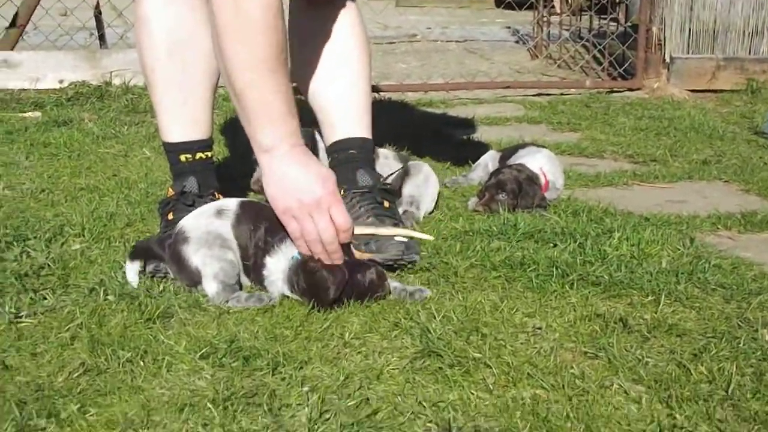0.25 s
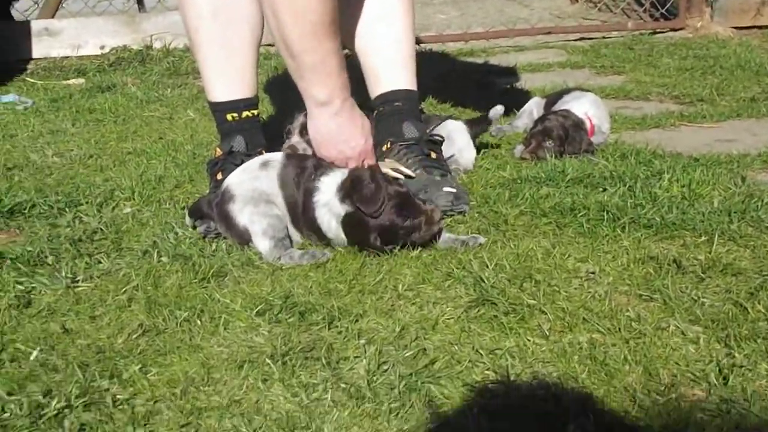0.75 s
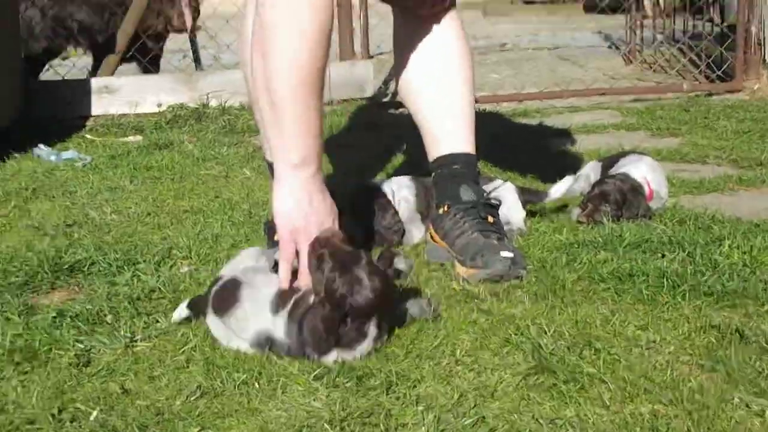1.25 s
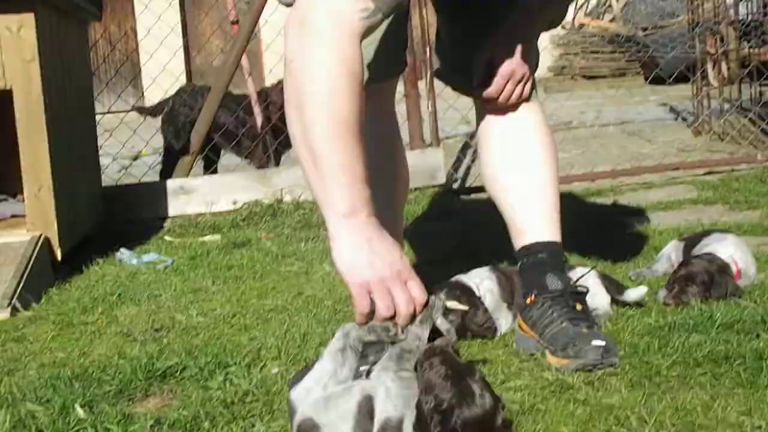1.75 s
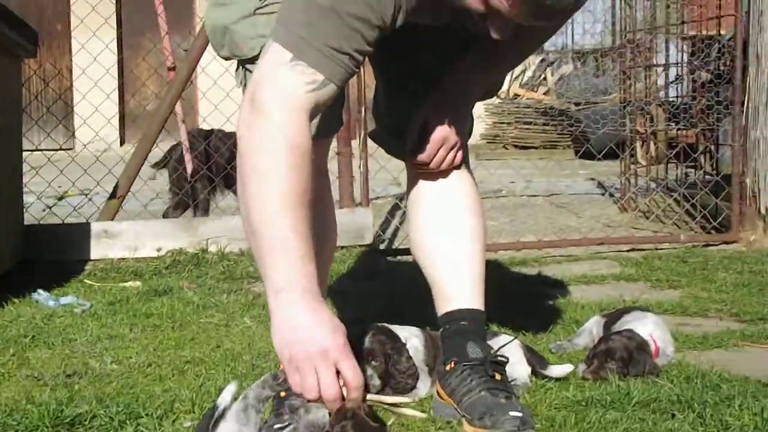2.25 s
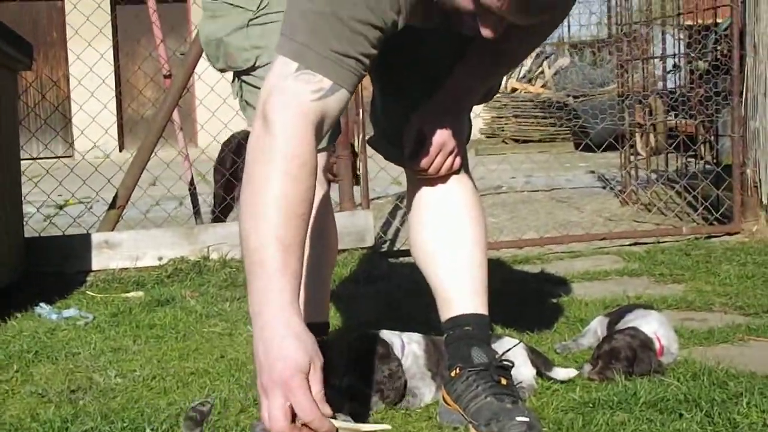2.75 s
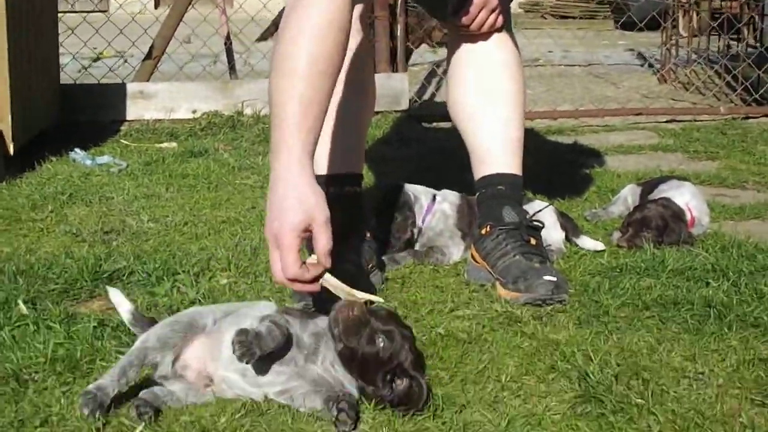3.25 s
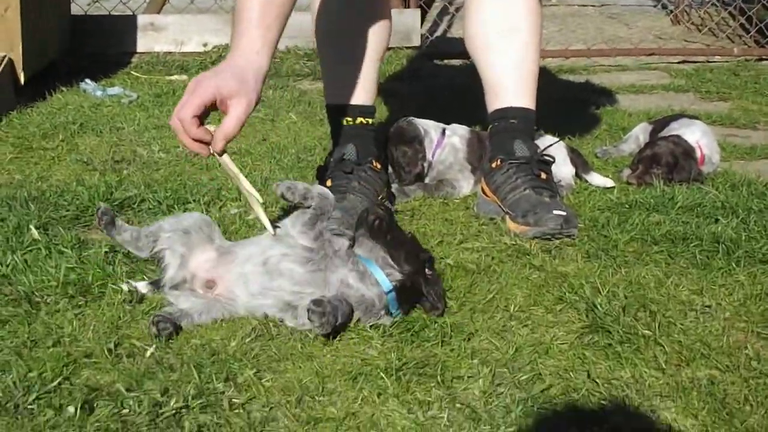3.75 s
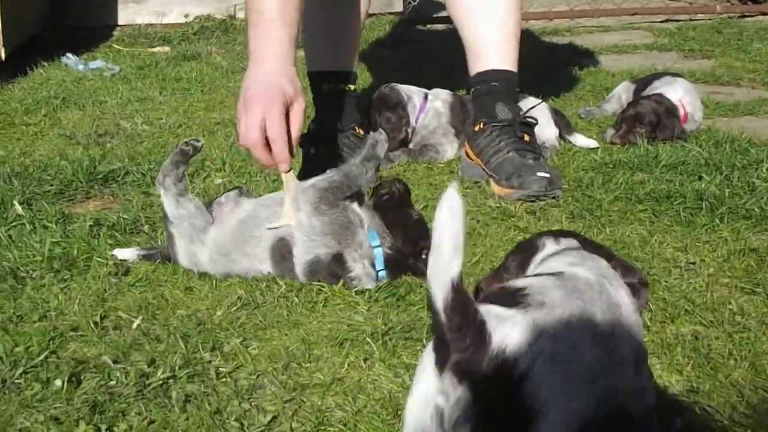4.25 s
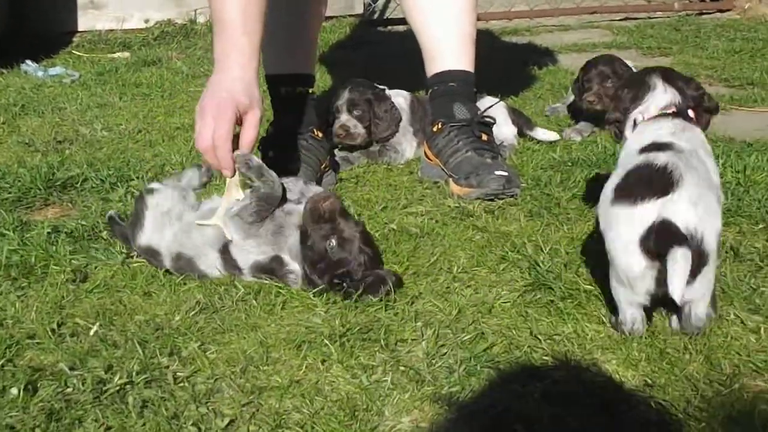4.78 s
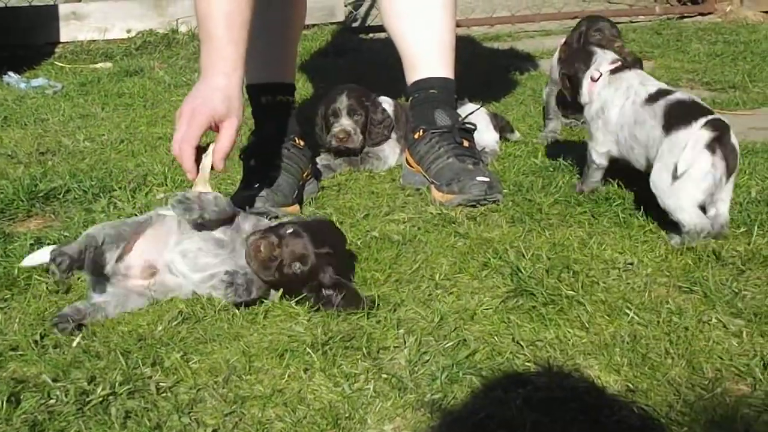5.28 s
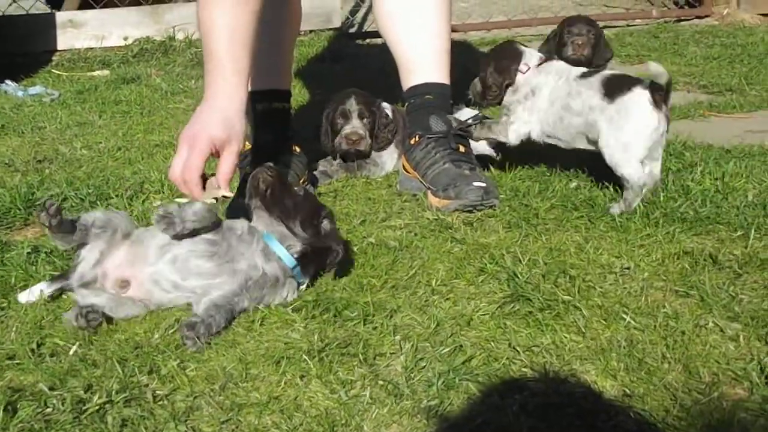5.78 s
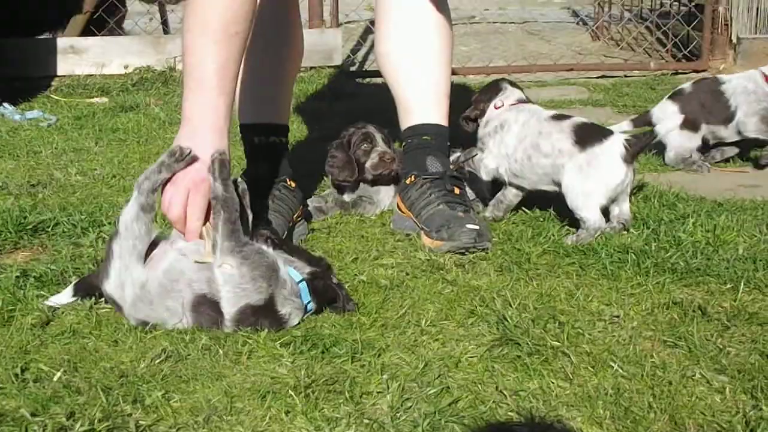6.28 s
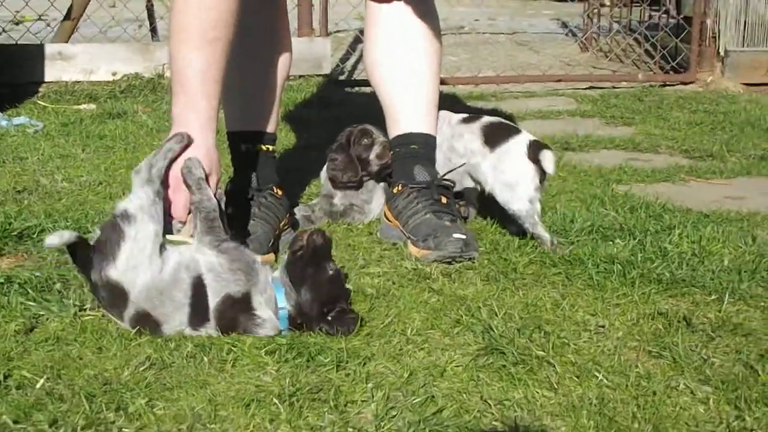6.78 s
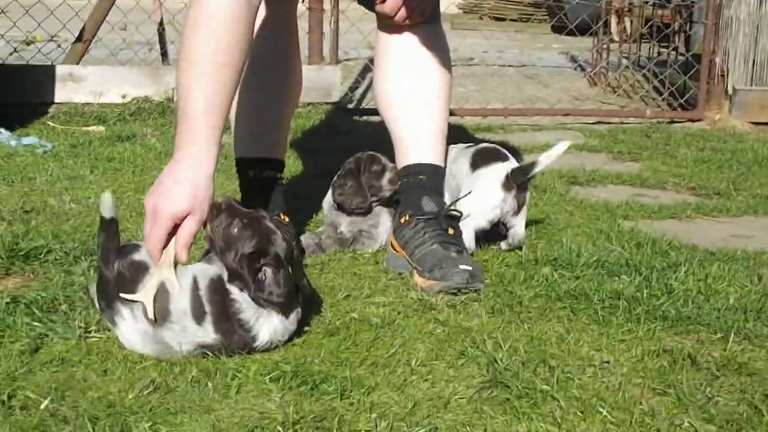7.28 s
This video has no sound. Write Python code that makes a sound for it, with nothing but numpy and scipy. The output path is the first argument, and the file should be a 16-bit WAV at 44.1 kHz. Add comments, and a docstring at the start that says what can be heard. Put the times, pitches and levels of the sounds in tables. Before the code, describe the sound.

Close dry grass rustling, paw scuffs and sudden hard knocks of teeth on a chew, over constant hiss and brief low gusts of wind.

```python
"""Puppy on the lawn

A puppy rolls on a lawn and grabs at a hard forked chew held in a hand, while its litter mates potter about.
Grass crackles as showers of random snaps; paws scuff in short dense showers; bites on the chew are damped
modes with bursts of noise. Gusts are low noise rumbling on the microphone, over a steady hiss and a faint whine.
The hollow resonances of the microphone housing colour the hiss and the rustle."""
import sys
import numpy as np
from scipy import signal
from scipy.fft import rfft, irfft, next_fast_len
from scipy.io import wavfile
from scipy.ndimage import uniform_filter1d

SR = 44100
rng = np.random.default_rng(int(sys.argv[2]) if len(sys.argv) > 2 else 0)


def dump_mix(stems):
    """Bounce the given channels to the path in sys.argv[1] as a 16-bit WAV at rate SR."""
    frames = np.atleast_2d(stems).T  # one column per channel
    limited = np.clip(frames, -1, 1)  # hard clip at full scale
    pcm = np.round(limited * 32767).astype(np.int16)
    wavfile.write(sys.argv[1], SR, pcm)


N = 332073
TIME = np.arange(N) / SR  # seconds
FFT_SIZE = next_fast_len(N)
BINS = np.maximum(np.fft.rfftfreq(FFT_SIZE, 1 / SR), 1)  # Hz, kept above 0 for the logarithm


def from_db(db):
    """Decibels to gain."""
    return 10 ** (np.asarray(db) / 20)


def rms_one(x):
    """Scale to unit power."""
    return x / np.sqrt(np.mean(x ** 2) + 1e-20)


def at_bins(points):
    """Read a table of (Hz, value) at every bin, straight lines over log frequency."""
    hz, value = np.transpose(points)
    return np.interp(np.log(BINS), np.log(hz), value)


def band(x, low_hz, high_hz, order=2):
    """Causal band-pass."""
    edges = [low_hz, min(high_hz, .45 * SR)]
    return signal.sosfilt(signal.butter(order, edges, "band", fs=SR, output="sos"), x)


def add(track, s, sound):
    """Mix a sound into a track from time s on."""
    start = round(s * SR)
    low, high = max(start, 0), min(start + sound.shape[-1], N)
    track[..., low:high] += sound[..., low - start:high - start]


def flutter(per_s):
    """A random wavering with unit rms, given its turning points per second."""
    knots = rng.standard_normal(4000)
    return rms_one(np.interp(TIME * per_s, np.arange(len(knots)), knots))


def swell(half_s):
    """Time axis around a brief event and its bell-shaped envelope."""
    reach = int(3 * half_s * SR)
    t = np.arange(-reach, reach) / SR
    return t, np.exp(-.5 * (t / half_s) ** 2)


def surge(s, rise_s, fall_s, shape=1.72):
    """A rounded build-up to 1 at time s and a die-away."""
    distance = np.abs((TIME - s) / np.where(TIME < s, rise_s, fall_s))
    return np.exp(-.5 * np.minimum(distance ** shape, 100))


def grains(count, per_s, spread_db):
    """Two streams of tiny random snaps: many weak, a few strong."""
    born = rng.random((2, count)) < per_s / SR
    sizes = from_db(spread_db * np.minimum(rng.exponential(1, (2, count)), 4))
    return born * sizes * rng.choice([-1, 1], (2, count))


def ring(t, hz, t60, rise_s=0.00042):
    """A damped mode, set going by a contact of finite length."""
    return from_db(-60 * t / t60) * np.sin(2 * np.pi * hz * t) * (1 - np.exp(-t / rise_s))


def housing():
    """Peaks and notches of the cavities in front of the microphone, in dB."""
    # Cavity colours. Each row: centre in Hz, full width at half height in Hz, peak or notch in dB.
    cavities = [(854, 120, 2.5), (1250, 228, 10.5), (1810, 190, 4.5), (2130, 140, -4), (2351, 244, 10),
                (2640, 88, -2.5), (2990, 270, 5), (3000, 75, -2), (3275, 193, 11), (3552, 200, 7.5),
                (3890, 144, -9), (4700, 230, 4), (5110, 160, -6), (5675, 395, -9.5)]
    return sum(db * np.exp(-np.log(2) * (2 * (BINS - hz) / width) ** 2) for hz, width, db in cavities)


def in_housing(x, share):
    """A brief sound rings on in the housing: the same peaks and notches, with causal phase."""
    cepstrum = irfft(np.log(from_db(share * housing())), FFT_SIZE)[:FFT_SIZE // 2]
    response = np.exp(2 * rfft(cepstrum, FFT_SIZE))
    return irfft(rfft(x, FFT_SIZE) * response, FFT_SIZE)[..., :N]


def in_stereo(pair, colour_db):
    """Colour two unrelated signals and mix them into left and right, identical in the bass; rms 1."""
    # Stereo width. Each row: frequency in Hz, left-right correlation.
    likeness = [(300, 1), (2000, .997), (4500, .96), (9000, .87), (14000, .85)]
    mid, side = rfft(pair, FFT_SIZE) * from_db(colour_db)
    alike = np.clip(at_bins(likeness), -1, 1)
    left_right = np.sqrt(1 + alike) * mid + np.sqrt(1 - alike) * side * [[1], [-1]]
    return rms_one(irfft(left_right, FFT_SIZE)[:, :N])


def whine():
    """Faint steady sine tones, the whine of electronics."""
    # Electronic tones. Each row: pitch in Hz, rms level in dB.
    tones = [(2801, -61.5), (7220, -69), (8021, -80)]
    return sum(from_db(db) * np.sqrt(2) * np.sin(2 * np.pi * hz * TIME) for hz, db in tones)


def hiss(level_db=-41):
    """Even background hiss: noise coloured by the housing."""
    # Hiss spectrum ahead of the housing. Each row: frequency in Hz, density in dB per Hz.
    hiss_spectrum = [(30, -2.5), (130, 0), (300, -1), (450, -5.5), (700, -5.5), (1000, -5.5), (1550, -7),
                     (2500, 1.5), (4200, -1.5), (7300, -2.5), (8300, -14), (9700, -22), (13500, -24),
                     (15800, -27)]
    return from_db(level_db) * in_stereo(rng.standard_normal((2, N)), at_bins(hiss_spectrum) + housing())


def wind(calm_db=-52.5, fine_eddies_db=-22):
    """Eddies rumble alike on left and right; each sudden buffet reaches up to its own edge frequency."""
    # Gusts on the microphone. Each row: height in seconds, rumble in dB, build-up in s, die-away in s.
    gusts = [(.05, -24.5, 0.24, .33), (.6, -29.5, 0.08, 0.088), (1.22, -42, 0.099, 0.14),
             (1.49, -33, 0.046, 0.052), (1.72, -40.5, 0.035, 0.16), (3.06, -37.5, .12, 0.052),
             (3.28, -38, 0.062, 0.088), (6.58, -45, 0.023, 0.14), (7.09, -35.5, .07, 0.11),
             (7.44, -30, 0.059, 0.041)]
    # Sudden buffets of air. Each row: centre in seconds, rms at the height in dB, half length in s,
    # upper edge in Hz.
    buffets = [(0.013, -16, 0.01, 307), (0.1, -24, 0.011, 285), (0.145, -19.5, 0.014, 71),
               (0.186, -34, 0.023, 210), (0.341, -29.5, 0.027, 152), (0.583, -32, 0.014, 220),
               (0.614, -25.5, .018, 100), (3.054, -32.5, 0.021, 61.6), (6.589, -41, 0.0117, 200),
               (6.652, -38.5, 0.027, 213), (7.195, -36, .022, 214), (7.442, -31.5, 0.014, 82)]
    # Rumble spectrum. Each row: frequency in Hz, density in dB per Hz.
    rumble_spectrum = [(15, 2), (30, 3), (60, -2), (100, -9.5), (200, -23), (400, -51), (800, -64)]

    power = from_db(calm_db) ** 2  # the breeze between gusts
    for s, db, rise_s, fall_s in gusts:
        power = power + (from_db(db) * surge(s, rise_s, fall_s)) ** 2
    eddies = in_stereo(rng.standard_normal((2, N)), at_bins(rumble_spectrum))
    # even out the slow swings, so that the gusts alone set the level
    eddies = eddies / np.sqrt(uniform_filter1d(eddies[0] ** 2, SR // 8))
    out = np.sqrt(power) * eddies

    for s, db, half_s, hz in buffets:
        t, envelope = swell(half_s)
        air = rng.standard_normal(SR // 2)
        # a weak band of finer eddies lies above the edge
        puff = band(air, hz / 4, hz, order=3) + from_db(fine_eddies_db) * band(air, hz, 3 * hz)
        puff = puff[-len(t):] * envelope  # the settled end of the filtered noise
        add(out, s + t[0], from_db(db) * rms_one(puff) * np.sqrt(np.mean(envelope ** 2)))
    return out


def squeaks(roughness=0.38):
    """Brief thin tones whose pitch jitters at random from sample to sample."""
    # Faint short squeaks. Each row: centre in seconds, rms at the height in dB, half length in s, pitch in Hz.
    squeak_table = [(2.215, -46, .016, 1040), (2.697, -45, 0.011, 1055), (7.254, -32.5, 0.0074, 1622)]
    out = np.zeros(N)
    for s, db, half_s, hz in squeak_table:
        t, envelope = swell(half_s)
        unsteady_hz = hz * (1 + roughness * rng.standard_normal(len(t)))
        phase = 2 * np.pi * np.cumsum(unsteady_hz) / SR
        add(out, s + t[0], from_db(db) * np.sqrt(2) * envelope * np.sin(phase))
    return out


def bumps(t60=0.035, low_hz=110, high_hz=800):
    """Soft soil answers a body or paw with a dull short thud of decaying noise."""
    # Bumps on the soil. Each row: start in seconds, peak level in dB.
    bump_table = [(0.976, -31), (1.465, -38), (1.511, -25), (1.523, -28.5), (1.737, -36), (1.978, -36),
                  (5.45, -31.5), (6.178, -27.5), (6.561, -31)]
    out, t = np.zeros(N), np.arange(SR // 10) / SR
    for s, db in bump_table:
        thud = band(rng.standard_normal(len(t)) * from_db(-60 * t / t60), low_hz, high_hz, order=1)
        add(out, s, from_db(db) * thud / np.abs(thud).max())
    return out


def tussle(rest_rustle_db=-56, rest_swish_db=-66, swish_power=1.9):
    """Levels in dB of the bending of blades and of the sliding over them; overlapping rolls add in power."""
    # The puppy rolls or wriggles. Each row: height in seconds, rustle in dB, build-up in s, die-away in s,
    # bright swish of sliding in dB relative to the rustle.
    rolls = [(1.40, -34, 0.18, 0.37, -12.5), (1.99, -42, 0.034, 0.031, -12),
             (2.24, -36.5, 0.027, 0.016, -15), (2.55, -47, 0.076, .08, -13), (3.0, -49, 0.38, 0.35, -14),
             (3.57, -41.5, 0.071, 0.08, -14), (3.81, -36.5, .045, 0.13, -30), (4.04, -40, .05, 0.069, -24),
             (4.6, -60, 0.27, 0.21, -9), (6.188, -32.5, 0.011, 0.018, -13), (6.62, -39, 0.031, 0.046, -16),
             (6.915, -32, 0.071, 0.036, -8), (7.065, -30, 0.021, 0.041, -8.5), (7.29, -40, 0.15, .14, -15)]
    # a faint even rustle lies under the rolls
    bend, slide = from_db(rest_rustle_db) ** 2, from_db(rest_swish_db) ** 2
    for s, db, rise_s, fall_s, swish_db in rolls:
        effort = surge(s, rise_s, fall_s, shape=1.47)
        bend = bend + (from_db(db) * effort) ** 2
        # the swish swells more steeply than the rustle
        slide = slide + (from_db(db + swish_db) * effort ** swish_power) ** 2
    return 10 * np.log10(bend), 10 * np.log10(slide)


def grass(bend, slide, clump_db=2.25, wriggle_db=2.0):
    """Blades snap back by the thousand under the rolling body; sliding adds a finer, brighter crackle."""
    # Rustle spectrum ahead of the housing. Each row: frequency in Hz, density in dB per Hz.
    rustle_spectrum = [(200, -10), (650, -14.5), (830, -9.5), (1200, 1), (1550, -6), (1800, -4), (2100, 10),
                       (2400, -1.5), (2750, 2.5), (3300, 2), (3900, 4), (4400, -8), (5200, -9),
                       (8000, -20.5), (15000, -38)]
    # Swish spectrum ahead of the housing. Each row: frequency in Hz, density in dB per Hz.
    swish_spectrum = [(2000, -25), (4000, 4), (5500, 6.5), (7200, 6.5), (8500, 6), (10000, -10.5),
                      (14000, -5), (15800, -29)]
    unevenness = clump_db * flutter(220) + wriggle_db * flutter(30)
    rustle_snaps = grains(N, per_s=3800, spread_db=2.9)
    swish_snaps = grains(N, per_s=2500, spread_db=4.7)
    rustle = in_stereo(rustle_snaps, at_bins(rustle_spectrum) + 0.78 * housing())
    swish = in_stereo(swish_snaps, at_bins(swish_spectrum) + 0.42 * housing())
    return rustle * from_db(bend + unevenness) + swish * from_db(slide + unevenness)


def stalks(bend, per_s=220, stalk_db=-1.0, spread_db=3.0, cycles=16, low_hz=1600, high_hz=5200):
    """Stiffer stalks break, each ringing briefly at its own pitch; louder as the puppy presses harder."""
    out, t = np.zeros(N), np.arange(SR // 60) / SR
    for wait, size, pitch in rng.random(size=(4000, 3))[:int(per_s * N / SR)]:
        s = wait * N / SR
        hz = low_hz * (high_hz / low_hz) ** pitch
        level_db = bend[int(wait * N)] + stalk_db + spread_db * min(-np.log(1 - size), 2)
        add(out, s, from_db(level_db) * ring(t, hz, cycles / hz))
    return in_housing(out, 0.5)


def scuffs(snaps_per_s=6000, width=1.49, bright_db=-14):
    """A paw drags through the turf: a short dense shower of snaps."""
    # Paws and fur on the turf. Each row: centre in seconds, level at the height in dB (ahead of the housing,
    # without the bright part), half length in s, centre frequency in Hz.
    scuff_table = [(0.311, -33, 0.0066, 1830), (0.334, -33.5, .008, 1650), (1.282, -34.5, 0.01, 3020),
                   (1.388, -30, .008, 2450), (1.513, -28, .004, 1780), (1.570, -27, .009, 2830),
                   (1.631, -28.5, 0.0026, 2550), (1.738, -38, 0.0054, 1256), (3.469, -41, .016, 3400),
                   (3.581, -41.5, .02, 2180), (3.772, -35.5, 0.011, 2500), (3.846, -36.5, .012, 2840),
                   (3.972, -34, 0.0093, 2160), (4.301, -48.5, 0.048, 1630), (5.212, -52, 0.042, 1900),
                   (5.458, -31.5, 0.0064, 3300), (5.573, -36.5, .006, 3400), (5.667, -41, 0.0091, 2590),
                   (5.783, -45, 0.0088, 2020), (6.179, -32, 0.0048, 2930), (6.841, -34, .006, 2530),
                   (6.912, -31, 0.0072, 5060), (7.134, -31.5, 0.0076, 1850), (7.297, -31.5, .011, 2060),
                   (7.418, -38.5, 0.0044, 1610)]
    out = np.zeros(N)
    for s, db, half_s, hz in scuff_table:
        t, envelope = swell(half_s)
        coarse, fine = grains(len(t), snaps_per_s, spread_db=0.75)
        body = rms_one(band(coarse, hz / width, hz * width))
        bright = from_db(bright_db) * rms_one(band(fine, 770, 7900, order=3))
        add(out, s + t[0], from_db(db) * envelope * (body + bright))
    return in_housing(out, 0.5)


def bites(ring_db=3.0, edge_db=-1.5, grit_db=-8, scatter_db=-26):
    """A tooth slips off the chew: a crack, damped cycles, a gritty graze, scatter from the ground and legs."""
    # Teeth and claws on the chew. Each row: start in seconds, overall level in dB ahead of the layer trims,
    # main ring pitch in Hz, hard snap in dB relative to the main ring, crack in dB ahead of its edge trim.
    bite_table = [(0.977, -29.5, 1690, 0.5, -22), (1.3876, -21.5, 2060, 4, 3), (1.3996, -16, 1800, -6, -14),
                  (1.4653, -11, 2840, -2, -21), (1.5116, -22.5, 1980, -2, 3), (1.5166, -23, 2320, 8, -7),
                  (1.5241, -17.5, 3420, 0, -2.5), (1.5630, -12, 4800, -9, -12), (1.568, -13, 4960, -4, -18),
                  (1.6264, -29, 2350, 5, -7), (1.712, -20.5, 3450, -4, -1), (1.7205, -15.5, 2090, -2, -12),
                  (1.8138, -16.5, 1890, 4, -17.5), (1.8160, -21, 1490, -6, -26),
                  (1.8962, -26, 2050, 4, -20), (1.98, -26, 1440, 2, -21), (2.1773, -22.5, 2390, -0.5, -25),
                  (2.2897, -25, 1810, 1, -17), (2.5073, -29, 1900, 1, -20), (3.4104, -31.5, 2440, 6.5, -4),
                  (3.9052, -20, 2840, -1, -12), (4.01, -26, 2060, -5, -10), (4.07, -27, 2400, -5, -4),
                  (5.4513, -23, 3480, -6, -4), (5.6650, -23.5, 3500, -11, -17), (6.1789, -26, 2370, 6, -6),
                  (7.0183, -11, 2060, -0.5, -2.5), (7.047, -23, 2300, 3, -5), (7.0964, -17, 2070, -9, -14),
                  (7.1278, 3, 2060, -23, -22), (7.243, -12, 2080, -7.5, -14)]
    knock, snap = (1174, 0.0081), (3230, 0.0093)  # shared resonances: Hz, t60 in s
    knock_re_snap_db, bluntness = -14, 0.57  # a blunt bite trades crack for knock, dB per dB
    # a firmer bite damps the chew: its ring halves in length every damping_db
    ring_t60_s, light_bite_db, damping_db = 0.014, -19, 26
    crack_t60, grit_t60, scatter_t60 = 0.0066, 0.026, 0.087  # seconds

    out, t = np.zeros(N), np.arange(SR // 10) / SR
    for s, db, hz, snap_db, crack_db in bite_table:
        t60 = ring_t60_s * .5 ** ((db - light_bite_db) / damping_db)
        knock_db = snap_db + knock_re_snap_db - bluntness * crack_db
        body = ring(t, hz, t60) - from_db(knock_db) * ring(t, *knock) + from_db(snap_db) * ring(t, *snap)
        noise = rng.standard_normal((3, len(t)))
        crack = rms_one(band(noise[0], 3100, 7800)) * from_db(edge_db + crack_db - 60 * t / crack_t60)
        grit = rms_one(band(noise[1], 2000, 3670, order=3)) * from_db(grit_db + snap_db - 60 * t / grit_t60)
        scatter = rms_one(band(noise[2], 1070, 1900)) * from_db(scatter_db - 60 * t / scatter_t60)
        bite = from_db(ring_db) * body + crack + grit + scatter
        add(out, s, from_db(db) * band(bite, 680, 12600))
    return out


def scene():
    """Open air, all close and dry; left slightly later than right, fading in from 600 to 1000 Hz."""
    bend, slide = tussle()
    background = whine() + hiss() + wind()
    turf = grass(bend, slide) + stalks(bend) + scuffs() + bumps()
    left, right = background + turf + squeaks() + bites()
    left_lag_s = .92 / SR
    lag = left_lag_s * np.interp(BINS, [600, 1000], [0, 1])  # the bass stays mono
    late_left = irfft(rfft(left, FFT_SIZE) * np.exp(-2j * np.pi * BINS * lag), FFT_SIZE)[:N]
    return np.array([late_left, right])


def record(dry, cutoff_hz=15800):
    """Peaks are clipped at full scale, then a steep low-pass cuts the top."""
    low_pass = signal.ellip(10, .1, 80, cutoff_hz, fs=SR, output="sos")
    return signal.sosfilt(low_pass, np.clip(dry, -1, 1))


dry = scene()
out = record(dry)
dump_mix(out)
```